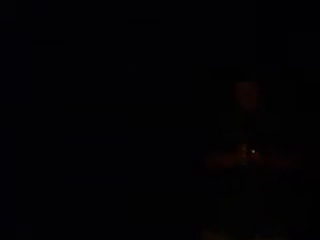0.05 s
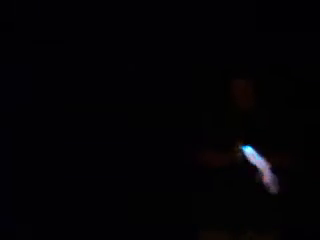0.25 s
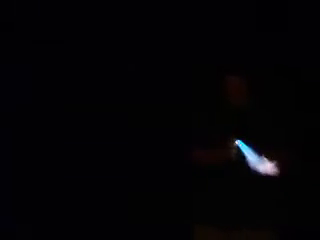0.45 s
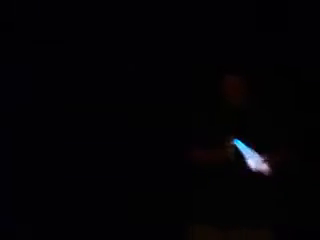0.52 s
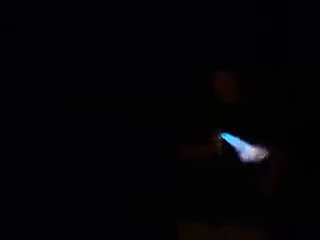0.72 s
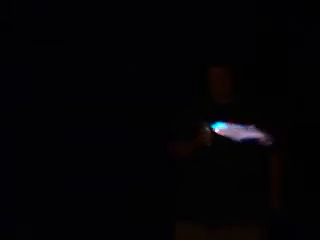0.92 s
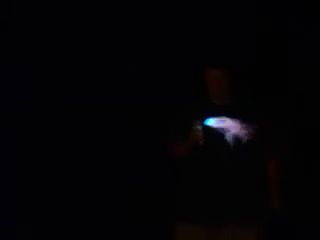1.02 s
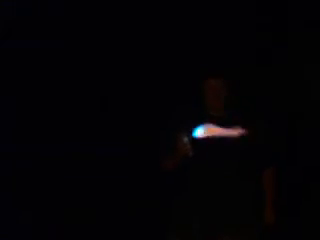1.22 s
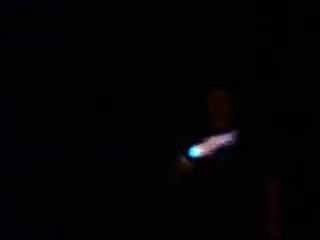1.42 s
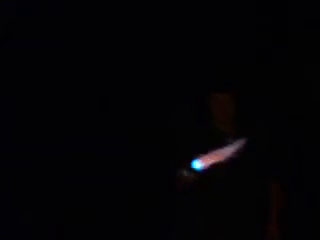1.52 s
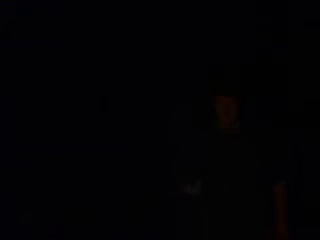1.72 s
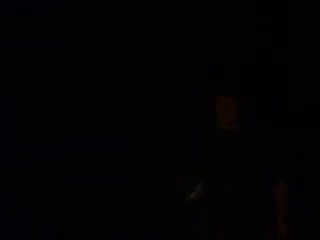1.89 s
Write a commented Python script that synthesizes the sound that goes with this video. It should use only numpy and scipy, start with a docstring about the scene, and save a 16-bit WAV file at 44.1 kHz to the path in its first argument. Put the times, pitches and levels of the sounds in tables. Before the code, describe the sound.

A gas flame jet catches with a soft thump and burns with a fluttering, swelling roar and small pops. It dies suddenly, leaving a faint hiss, heard from a few metres away in a quiet place with a slight echo.

```python
"""Lighting a gas torch

Gas hisses from a hand-held nozzle a few metres away, puffs alight once, then catches as a flame jet.
The swirling flame roars and flutters, grows fuller as the jet is raised and goes out, while the unlit
gas hisses on. Nearby surfaces colour the roar, differently as the jet swings up, and add a short echo."""
import sys
import numpy as np
from scipy import signal
from scipy.fft import rfft, irfft, next_fast_len
from scipy.io import wavfile
from scipy.ndimage import map_coordinates

SR = 44100
rng = np.random.default_rng(int(sys.argv[2]) if len(sys.argv) > 2 else 0)


def digitize_waveform(pressure):
    """Quantize a signal to 16-bit integers and store it at the path in sys.argv[1].

    Rows of a 2-D input are taken as channels; values are limited to [-1, 1].
    """
    field = np.atleast_2d(pressure).T
    bounded = np.clip(field, -1, 1)
    quanta = np.round(bounded * 32767).astype(np.int16)
    wavfile.write(sys.argv[1], SR, quanta)


N = 85995

FLARE_RISE_S = 0.0012
# Pitches the surroundings boost or weaken. Each row: pitch in Hz, width in Hz, boost in dB.
RESONANCES = [(69, 9.9, 2.5), (112.6, 15.4, 8.5), (147, 15, -1), (194.8, 28, 10), (268, 24, -7.5),
              (294, 24, 5.5), (343, 16, -5.5), (408, 39, 1), (460, 31, 1), (556.5, 30.5, -7),
              (605.5, 13, 6), (642.4, 51, 5.5), (3160, 430, 8)]


def flame(t):
    """The jet catches, burns with a roar, a rumble and a ring, then dies away."""
    # Loudness of the roar, the rumble and the ring. Each row: time in seconds, relative level in dB.
    roar_levels = [(.215, -42), (.28, -44.5), (.325, -46.5), (.36, -48.5), (.4, -38.5), (.45, -43.5),
                   (.482, -45), (.505, -38.5), (.54, -42.5), (.58, -42.5), (.62, -42), (.69, -42),
                   (.74, -43), (.81, -41), (.865, -37.5), (.89, -37.5), (.94, -35.5), (.99, -33.5),
                   (1.012, -36), (1.04, -34.5), (1.1, -34.5), (1.15, -32.5), (1.21, -35), (1.3, -33),
                   (1.335, -34.5), (1.41, -34.5), (1.465, -35), (1.53, -33), (1.612, -38)]
    rumble_levels = [(.21, -53), (.3, -55.5), (.38, -59), (.46, -58.5), (.6, -56), (.72, -59), (.81, -57.5),
                     (.91, -44), (.96, -50), (1.08, -51.5), (1.2, -44), (1.27, -42.5), (1.32, -49),
                     (1.38, -39.5), (1.425, -50.5), (1.49, -42.5), (1.6, -54), (1.64, -45)]
    ring_levels = [(.36, -57), (.375, -50), (.43, -47.5), (.51, -47), (.58, -59), (.77, -49), (.81, -44.5),
                   (.87, -49), (1.05, -44.5), (1.2, -60)]
    # Tone of the rumble. Each row: pitch in Hz, relative level in dB.
    rumble_tone = [(15, -42), (35, -18.5), (65, 0), (110, -5.5), (160, -2), (215, 2), (270, -11),
                   (500, -39.5)]
    light_s, catch_s, out_s, fade_s = 0.2025, 0.0072, 1.636, 0.023
    lit = np.clip((t - light_s) / catch_s, 0, 1) * np.exp(-np.maximum(t - out_s, 0) / fade_s)
    flutter = walk(hz=57.5)  # the roar and the rumble flutter together
    roaring = roar(t, flutter) * undb(curve(roar_levels) - 1.5)
    rumble = unit(colour(turbulence() * undb(1.2 * flutter), rumble_tone, RESONANCES))
    rumble *= undb(curve(rumble_levels) - 1)
    ring = noise_band(np.full(N, 1003.4), width_hz=93) * undb(curve(ring_levels))
    return lit * (roaring + rumble + ring)


def roar(t, flutter):
    """Swirling gas burns, and near surfaces colour the sound according to where the jet points."""
    # Tone of the slim, full and raised flame. Each row: pitch in Hz, relative level in dB.
    slim_tone = [(150, -25), (240, -14.5), (330, -7), (450, 0), (650, -3), (800, -4), (1000, -3.5),
                 (1200, -10), (1600, -18), (2200, -26.5), (3100, -32), (4200, -40), (9000, -54)]
    full_tone = [(150, -24), (240, -12), (330, -4), (410, -0.5), (620, -1.5), (730, -6.6), (960, -6.6),
                 (1200, -9.5), (1500, -16.5), (2200, -25), (3100, -32), (4000, -35), (9000, -42.5)]
    raised_tone = [(150, -24), (240, -17.5), (330, -6.5), (420, 0), (620, -6.5), (740, -8), (950, -9),
                   (1300, -14), (1600, -17), (2200, -25.5), (3100, -33.5), (4000, -36), (9000, -44.5)]
    # Peaks and dips from echoes as the jet points down, level and up.
    # Each row: pitch in Hz, width in Hz, boost in dB.
    down_echoes = [(692, 47, 3), (835, 48.7, -5.5), (1090, 57, 2), (1315.6, 61.5, 1), (1513, 49, 10.5),
                   (1660, 28, 5), (1837, 29, 12.5)]
    level_echoes = [(814, 15.1, 7), (935, 24, 5), (960, 36.1, 5), (1283, 27, -12), (1447, 83, 9),
                    (1710, 31.5, -11), (1833, 69, 6.5)]
    up_echoes = [(798, 15, 8.5), (853, 23, 8.5), (990, 37, 2), (1200, 110, 6.5), (1380, 22, -7),
                 (1610, 29, 9.5), (1730, 29, 11.5)]
    grown = growth(t)
    tilted = ramp(t, middle_s=1.348, length_s=0.15)
    poses = ((1 - grown, slim_tone, down_echoes),
             (grown * (1 - tilted), full_tone, level_echoes),
             (grown * tilted, raised_tone, up_echoes))
    sound = np.zeros(N)
    for share, tone, echoes in poses:
        burning = turbulence() * undb(0.6 * flutter)
        sound += np.sqrt(share) * unit(colour(burning, tone, [*RESONANCES, *echoes]))
    return waver(sound)


def turbulence():
    """Burning swirls make a smooth rush, and many small pockets of gas pop."""
    pops_per_s, spread_db = 900, 2
    pops = (rng.random(N) < pops_per_s / SR) * undb(spread_db * np.minimum(rng.exponential(size=N), 4))
    return unit(noise() + undb(-6) * unit(pops - pops.mean()))


def waver(x):
    """The flame flaps about, so its pitches slide a little up and down."""
    speed = 1 + 0.012 * walk(hz=8.995)
    return map_coordinates(x, [np.cumsum(speed)], mode="mirror")


def growth(t):
    """Go from 0 for the slim jet to 1 for the full one."""
    return ramp(t, middle_s=0.89, length_s=0.12)


def flares(t):
    """Gas flares up in sudden, round-sounding puffs that fade fast."""
    # The flares. Each row: start in seconds, level in dB, fade time in seconds.
    puffs = [(0.206, -47, 0.022), (0.367, -49, 0.018), (0.389, -38.5, 0.0062), (0.414, -41.5, .005),
             (.505, -43, 0.0043), (0.801, -43, .005), (0.882, -33, 0.011), (1.186, -30, .005),
             (1.286, -38.5, .014), (1.619, -30, 0.014)]
    # Tone of a flare. Each row: pitch in Hz, relative level in dB.
    puff_tone = [(25, -34), (70, -20), (200, -9), (300, -8.5), (430, 10), (650, 4), (1000, -14), (1500, -8),
                 (2300, -25), (4000, -50), (9000, -48)]
    swell = sum(undb(db) * burst(t, start, fade) for start, db, fade in puffs)
    return swell * unit(colour(turbulence(), puff_tone, RESONANCES))


def false_start(t):
    """The first gas burns for a moment and goes out."""
    # Tone of this puff. Each row: pitch in Hz, relative level in dB.
    puff_tone = [(60, -13.5), (270, -17), (420, 2), (650, -2), (850, -16), (1200, -6), (1900, -10.5),
                 (2500, -24), (3500, -29), (9000, -51)]
    alight = burst(t, start_s=0.126, fade_s=0.0053, fade_after_s=0.022)
    return alight * undb(-57.5) * unit(colour(turbulence(), puff_tone, RESONANCES))


def thumps(t):
    """The gas expands each time it catches: one soft swing of pressure."""
    # Moments when the gas catches. Each row: time in seconds, relative level in dB.
    catches = [(.128, -66), (0.2057, -47)]
    width_s = 0.0023
    swing = lambda u: u * np.exp(-u ** 2 / 2)
    return sum(undb(db) * swing((t - when) / width_s) for when, db in catches)


def gas(t):
    """Flowing gas makes a hiss that brightens as the nozzle rises, a low rush and a sinking whistle."""
    # Loudness of the flow and the whistle. Each row: time in seconds, relative level in dB.
    flow_levels = [(0.0, -80), (0.064, -80), (0.118, -67.5), (.22, -65.5), (0.418, -62), (0.738, -58),
                   (0.808, -56), (1.666, -55.5), (1.688, -57.5), (1.884, -58.5), (1.95, -58.5)]
    whistle_levels = [(0, -96), (.064, -91), (.118, -71), (.25, -63.5), (.5, -62), (.77, -69), (.83, -56.5),
                      (.91, -60), (1.0, -56), (1.15, -63.5), (1.3, -66), (1.45, -59), (1.6, -65),
                      (1.66, -58.5), (1.71, -71), (1.95, -76)]
    # Tone of the hiss (nozzle down, nozzle up) and the rush. Each row: pitch in Hz, relative level in dB.
    down_tone = [(1200, -20), (2200, 1), (3000, 1.5), (3800, -3.5), (4400, 2), (5200, -3.5), (6200, 4),
                 (7300, 0.5), (8500, 1.5), (9700, -1), (10600, -5), (14000, -4.5), (15400, -2)]
    up_tone = [(1200, -6), (2200, -6), (3000, 3), (3900, -7), (4400, -2), (5200, -6), (6200, 3.5),
               (7500, -0.5), (8800, 1.5), (9800, 4), (10400, -1), (12000, -8), (14200, 0), (15400, -2.5)]
    rush_tone = [(30, -20), (70, -15.5), (200, -12.5), (350, -8.5), (490, -3.5), (650, -3), (950, -7),
                 (1200, -0.5), (1400, -3), (1650, -9), (2100, -20), (4000, -42.5)]
    raise_start_s, raise_end_s = 0.66, 1.93
    whistle_hz, sink_hz_per_s = 6613, 150
    raised = np.interp(t, (raise_start_s, raise_end_s), (0, 1))
    hiss = np.sqrt(1 - raised) * unit(colour(noise(), down_tone))
    hiss += np.sqrt(raised) * unit(colour(noise(), up_tone))
    whistle = noise_band(whistle_hz - sink_hz_per_s * t, width_hz=350) * undb(curve(whistle_levels) - 3)
    rush = unit(colour(noise(), rush_tone)) * undb(1 + 2.5 * growth(t))
    flow = (hiss * undb(1.5) + rush) * undb(curve(flow_levels))
    sputter_db = 0.61 * walk(hz=49.3)
    return (flow + whistle) * undb(sputter_db)


def surroundings(x, t):
    """Nearby surfaces scatter the sound and add a short echo."""
    gap_s, fade_s, echo_db = 0.0063, 0.075, -16.5
    echo = noise() * (t > gap_s) * undb(-60 * t / fade_s)
    return x + undb(echo_db) * signal.fftconvolve(x, echo / np.linalg.norm(echo))[:N]


def background():
    """A faint, steady noise from far away."""
    # Its tone. Each row: pitch in Hz, relative level in dB.
    air_tone = [(25, -3), (100, -7), (250, -5), (400, 3.5), (950, 1), (1500, -6.5), (2200, -12.5),
                (6000, -23.5), (15000, -36)]
    return undb(-70.5) * unit(colour(noise(), air_tone))


def burst(t, start_s, fade_s, fade_after_s=FLARE_RISE_S):
    """A quick rise, then a smooth fade."""
    rise = np.clip((t - start_s) / FLARE_RISE_S, 0, 1)
    return rise * np.exp(-np.maximum(t - start_s - fade_after_s, 0) / fade_s)


def ramp(t, middle_s, length_s):
    """Climb steadily from 0 to 1."""
    return np.clip((t - middle_s) / length_s + .5, 0, 1)


def undb(db):
    """Turn decibels into a multiplier."""
    return 10 ** (np.asarray(db) / 20)


def unit(x):
    """Scale to an average strength (rms) of 1."""
    return x / np.sqrt(np.mean(x ** 2))


def curve(rows):
    """Join (seconds, value) rows by straight lines."""
    return np.interp(np.arange(N) / SR, *np.array(rows).T)


def colour(x, tone, peaks=()):
    """Filter a sound by a tone table, plus any narrow peaks and dips."""
    size = 2 * next_fast_len(N)
    f = np.maximum(np.fft.rfftfreq(size, 1 / SR), 1)
    hz, db = np.array(tone, float).T
    db = np.interp(np.log(f), np.log(hz), db)
    db += sum(boost / (1 + (2 * (f - pitch) / width) ** 2) for pitch, width, boost in peaks)
    # Make the filter ring only after a sound, never before it.
    cepstrum = irfft(np.log(undb(db)))
    cepstrum[1:size // 2] *= 2
    cepstrum[size // 2 + 1:] = 0
    return irfft(rfft(np.resize(x, size)) * np.exp(rfft(cepstrum)))[:N]


def noise():
    """White noise."""
    return rng.standard_normal(N)


def walk(hz):
    """A smooth random wobble of strength 1, up to about the given rate."""
    f = np.fft.rfftfreq(N, 1 / SR)
    return unit(irfft(rfft(noise()) * f / (f + hz / 10) / (1 + (f / hz) ** 4), N))


def noise_band(hz, width_hz):
    """A breathy note: noise around a pitch that may move."""
    phase = 2 * np.pi * np.cumsum(hz) / SR
    return unit(walk(width_hz / 2) * np.cos(phase) + walk(width_hz / 2) * np.sin(phase))


def scene():
    """Flame and gas over a faint background."""
    t = np.arange(N) / SR
    torch = false_start(t) + thumps(t) + flame(t) + flares(t) + gas(t)
    return (surroundings(torch, t) + background())[None]


def record(dry):
    """A small microphone dulls part of the high treble and cuts off the very top."""
    dip_hz, dip_width_hz, dip_db, top_hz = 12090, 1070, -10.5, 15280
    f = np.fft.rfftfreq(2 * N, 1 / SR)
    dip = undb(dip_db * np.exp(-np.log(2) * (2 * (f - dip_hz) / dip_width_hz) ** 2))
    cut = 1 / np.sqrt(1 + (f / top_hz) ** 800)
    return irfft(rfft(dry, 2 * N) * dip * cut)[:, :N]


dry = scene()
out = record(dry)
digitize_waveform(out)
```